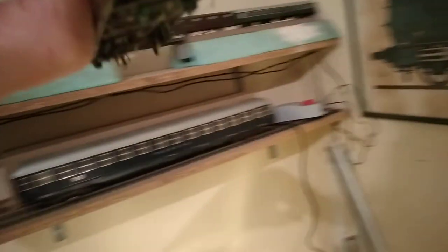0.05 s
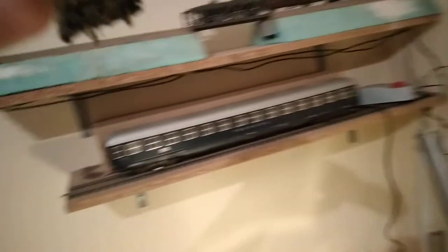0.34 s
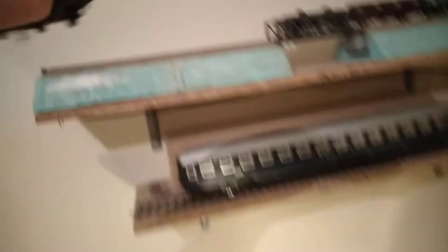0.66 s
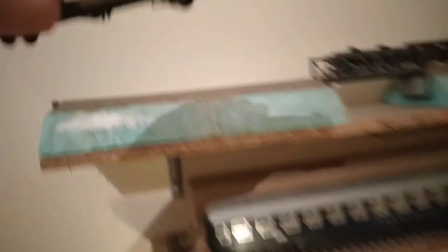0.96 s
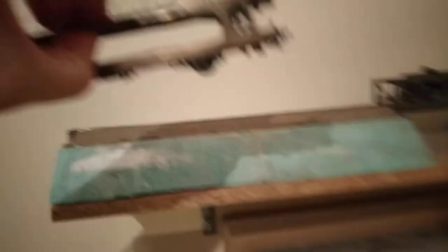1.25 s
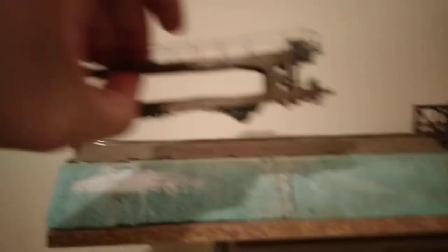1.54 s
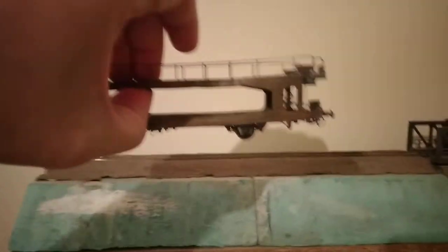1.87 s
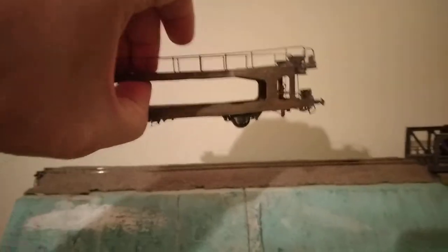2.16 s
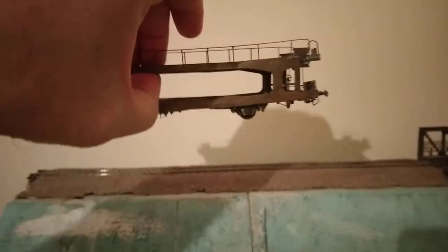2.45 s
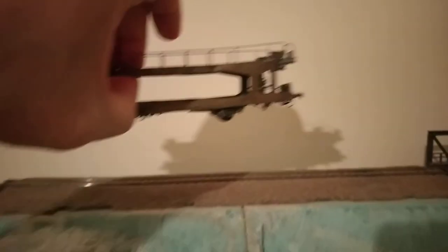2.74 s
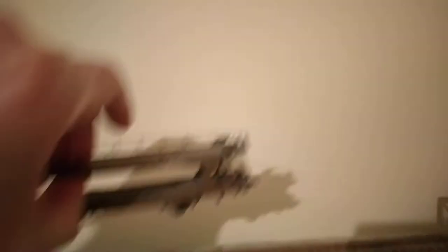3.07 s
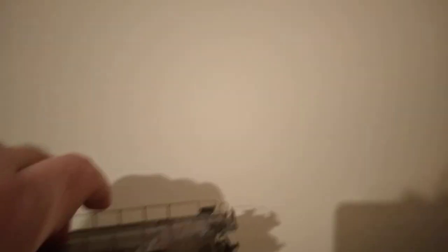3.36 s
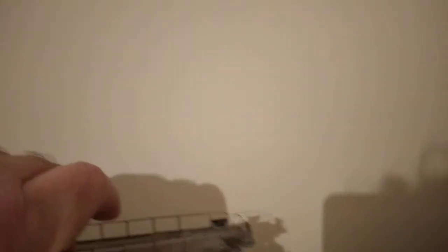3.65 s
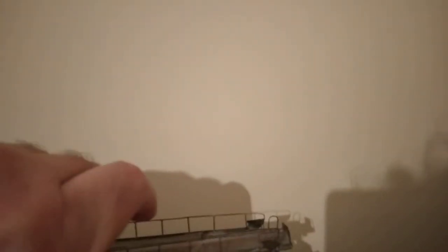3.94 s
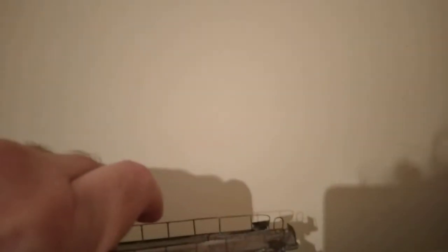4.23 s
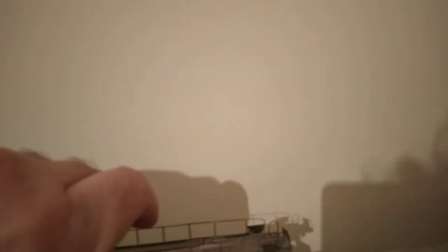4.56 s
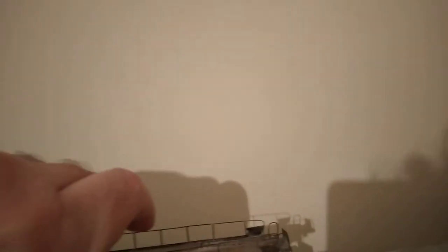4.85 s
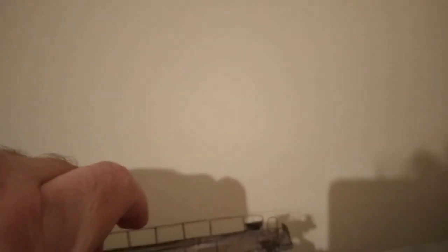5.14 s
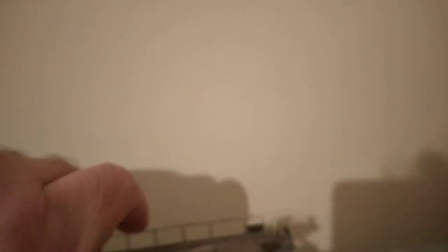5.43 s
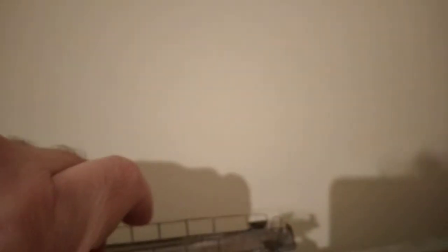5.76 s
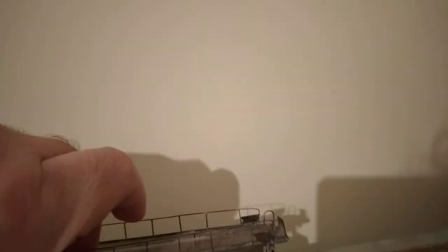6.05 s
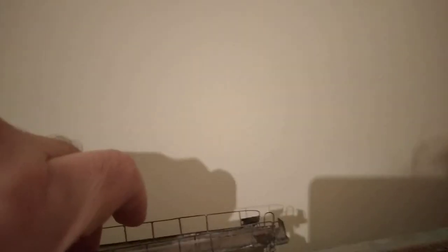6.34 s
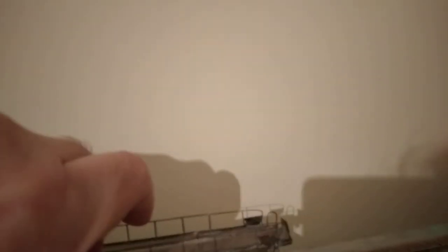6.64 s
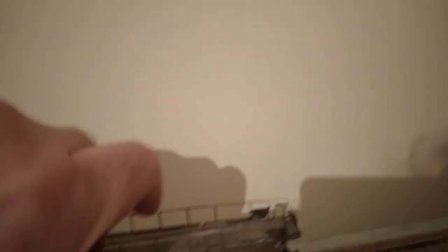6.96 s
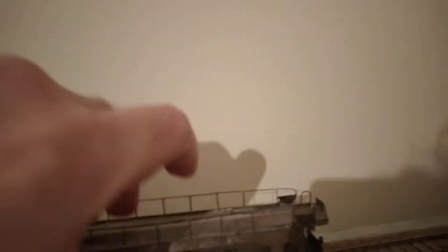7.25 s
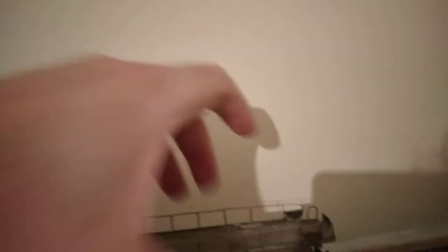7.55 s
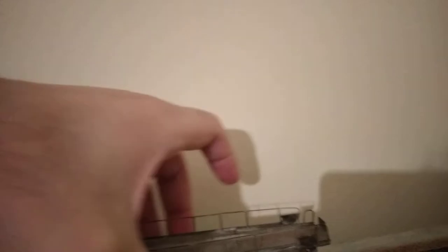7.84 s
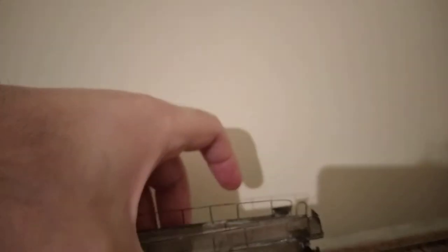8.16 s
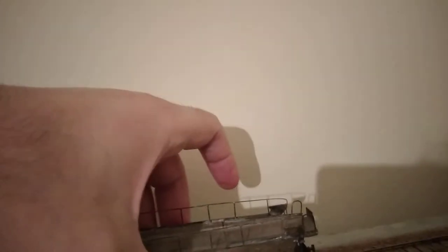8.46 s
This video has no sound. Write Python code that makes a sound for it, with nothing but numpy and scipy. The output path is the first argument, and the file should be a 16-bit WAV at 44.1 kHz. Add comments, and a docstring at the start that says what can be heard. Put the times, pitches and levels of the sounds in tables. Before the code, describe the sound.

Sharp clicks, small knocks and faint scraping as a model wagon is lifted from a shelf and fitted onto rails, with a lull between.

```python
"""In a small, quiet room a model railway wagon is pulled along a wooden shelf, which drones under its
wheels. The wagon is lifted off with a clatter. In the lull, the hand-held microphone's noise gate (a mute
for faint sound) flutters: the hand's tremor pushes it open, and it shuts whenever the hand is steady.
From 4.5 s the wagon is fitted onto a track, wheels and frame clicking and scraping on the rails. Then
the gate flutters again around two last clicks. The microphone makes everything dull above 2.5 kHz."""
import sys
import numpy as np
from scipy import signal
from scipy.fft import rfft, irfft, next_fast_len
from scipy.io import wavfile
from scipy.ndimage import uniform_filter1d, minimum_filter1d

SR = 44100
rng = np.random.default_rng(int(sys.argv[2]) if len(sys.argv) > 2 else 0)


def inscribe(sig):
    """Save sig as 16-bit PCM at rate SR to the path in sys.argv[1].

    A 1-D sig is mono; a 2-D sig holds one channel per row.
    Samples are clipped to [-1, 1] before scaling.
    """
    pcm = np.round(np.clip(np.atleast_2d(sig).T, -1, 1) * 32767)
    wavfile.write(sys.argv[1], SR, pcm.astype(np.int16))


N = 383669
TIME = np.arange(N) / SR


def amp(db):
    """Turns decibels into a factor to multiply a sound by."""
    return 10 ** (np.asarray(db) / 20)


def rms(x):
    """The average strength of a signal (root mean square)."""
    return np.sqrt(np.mean(x ** 2) + 1e-24)


def read_curve(points, hz):
    """Reads between the rows of a (pitch_hz, value) table, with octaves evenly spaced."""
    pitches, values = np.transpose(points)
    return np.interp(np.log(hz + 1), np.log(pitches + 1), values)


def level_curve(rows, column):
    """A smooth volume curve from a table of times and decibels, silent after the last row."""
    rows = np.asarray(rows)
    gain = amp(np.interp(TIME, rows[:, 0], rows[:, column]))
    return uniform_filter1d((TIME <= rows[-1, 0]) * gain, size=400)


def stroke(start, length, attack, release):
    """Rises from 0 to 1, holds, and falls back once its length is over (all in seconds)."""
    return np.clip((TIME - start) / attack, 0, 1) * np.clip(1 - (TIME - start - length) / release, 0, 1)


def add(mix, start_s, sound):
    """Adds a stereo sound to the mix at the given time."""
    part = mix[:, max(round(start_s * SR), 0):][:, :sound.shape[1]]
    part += sound[:, :part.shape[1]]


def microphone_pair(spectra, hz, balance):
    """Turns two unrelated spectra into left and right: alike in the bass, different in the treble."""
    # how alike the two microphone openings sound: pitch_hz, likeness (-1 to 1)
    likeness = [(50, .94), (300, .9), (600, .7), (1000, .25), (1900, -.15), (3000, 0), (12000, 0)]
    same = read_curve(likeness, hz)
    lean_left = amp(read_curve(balance, hz) / 2)
    right = same * spectra[0] + np.sqrt(1 - same ** 2) * spectra[1]
    return np.array([spectra[0] * lean_left, right / lean_left])


def room_noise(gain):
    """Stereo noise of strength 1, with its tone shaped by gain(hz)."""
    # how the room's sound leans to one side: pitch_hz, left_minus_right_db
    room_balance = [(60, 0), (92, 1.5), (140, 0), (220, -6.2), (330, -0.8), (500, -5), (770, 1.5),
                    (1180, 3), (1810, 4.5), (2770, 0.4)]
    size = next_fast_len(N, real=True)
    hz = np.fft.rfftfreq(size, 1 / SR)
    spectra = rng.standard_normal((2, len(hz))) + 1j * rng.standard_normal((2, len(hz)))
    sound = irfft(microphone_pair(spectra, hz, room_balance) * gain(hz), size)[:, :N]
    return sound / rms(sound)


def coloured_noise(colour):
    """Room noise whose tone follows a (pitch_hz, level_db) table."""
    return room_noise(lambda hz: amp(read_curve(colour, hz)))


def wander(rate):
    """A smooth random wobble of strength 1 that takes about `rate` new values a second."""
    spectrum = rfft(rng.standard_normal(N // 64))
    hz = np.arange(len(spectrum)) * SR / N
    wobble = irfft(spectrum / (1 + (2 * hz / rate) ** 10))
    return np.interp(TIME, np.linspace(0, N / SR, len(wobble)), wobble / rms(wobble))


def shelf_drone(drone_hz=157.4, waver_hz=1.9, others_db=9, pan_db=1.5):
    """Rolling wheels keep the board droning at its resonances, the pitches it naturally rings at."""
    # how strongly the wheels shake the shelf: time_s, drone_level_db, others_level_db
    rolling = [(0.0, -39, -54), (0.04, -34, -57.5), (0.132, -40, -60), (0.152, -46, -48.5),
               (0.172, -43, -62.5), (0.276, -32.5, -51), (0.414, -42.5, -51), (0.468, -51.5, -65),
               (0.56, -78, -69)]
    # the shelf's other resonances: pitch_hz, half_width_hz, level_db
    resonances = [(94.7, 1.6, 12), (171, 17, 2.5), (261, 12.3, -4.5), (336, 21, -9.5), (445, 25, -16)]
    pitch = drone_hz + waver_hz * wander(rate=40)
    drone = np.sqrt(2) * np.sin(2 * np.pi * np.cumsum(pitch) / SR) * level_curve(rolling, column=1)
    others = room_noise(lambda hz: sum(amp(db) / (1 + ((hz - centre) / width) ** 2) ** 1.1
                                       for centre, width, db in resonances))
    others *= amp(others_db) * level_curve(rolling, column=2)
    return drone * amp([[pan_db], [-pan_db]]) + others


def rubbing(gain_db=2, catch_db=1.6, attack_s=0.019, release_s=0.028):
    """Wagon and fingers rub along; the dry surfaces catch and slip unevenly."""
    # one rubbing stroke a row: start_s, length_s, level_db
    rubs = [(0.0, 0.72, -63.5), (4.633, 0.55, -70), (5.41, 0.38, -70), (6.293, 0.694, -65.5),
            (6.971, 0.37, -68)]
    # tone of the rubbing: pitch_hz, level_db
    rub_colour = [(50, -5), (150, 6.5), (400, -1.5), (650, 1.5), (1300, -4), (1700, -4.5), (2020, 0),
                  (2400, -16), (3300, -33), (8000, -59), (15000, -49.5)]
    pressure = sum(amp(db) * stroke(start, length, attack_s, release_s) for start, length, db in rubs)
    catching = amp(gain_db + catch_db * wander(rate=70))
    return pressure * catching * coloured_noise(rub_colour)


def holding_hand(tremor_hz=5.8, drift_hz=3, grip_db=-2, swell_drop_db=7, rest_db=-13.5, settle_s=0.01):
    """The hand trembles too slowly to hear, rumbles, and shifts softly on the microphone's case."""
    # how much the hand moves: time_s, tremor_db, rumble_db
    movement = [(0.0, -64, -62), (0.75, -62, -68), (1.5, -57.5, -69), (2.1, -60, -61.5), (2.4, -63.5, -66),
                (2.8, -62, -69), (3.0, -55, -62.5), (3.55, -61, -70), (3.75, -62.5, -67), (4.2, -61.5, -72),
                (4.5, -66.5, -68), (5.25, -65, -76), (5.7, -55, -54.5), (5.9, -55, -58), (6.27, -62.5, -49),
                (7.3, -61.5, -68.5), (7.85, -63, -71), (8.7, -61.5, -67.5)]
    # tone of the rumble: pitch_hz, level_db
    rumble_colour = [(8, -1), (25, -9), (42, 6.5), (75, 0.5), (110, -4), (160, -22.5), (400, -49),
                     (1500, -80.5)]
    # skin shifting on the case, one swell a row: middle_s, length_s, level_db
    grip_shifts = [(0.734, 0.17, -68), (1.352, .4, -69.5), (2.091, 0.66, -61), (3.376, 0.79, -62),
                   (5.279, 0.46, -65), (6.731, 0.84, -62)]
    # tone of the shifting skin: pitch_hz, level_db
    grip_colour = [(50, -16), (110, -5), (170, 4), (260, -10), (380, -2), (520, -11.5), (750, -12.5),
                   (2000, -54)]
    # moments when the hand holds steady: start_s, length_s
    rests = [(2.353, 0.023), (2.519, 0.0333), (2.798, 0.044), (3.761, 0.025), (3.943, 0.088), (4.26, 0.19),
             (4.599, 0.059), (7.668, .115), (8.004, .12), (8.169, 0.098), (8.444, 0.055)]
    cycles = np.cumsum(tremor_hz + drift_hz * wander(rate=16)) / SR
    tremor = np.sqrt(2) * np.sin(2 * np.pi * cycles) * level_curve(movement, column=1)
    rumble = level_curve(movement, column=2) * coloured_noise(rumble_colour)
    swells = sum(amp(db - swell_drop_db * (2 * (TIME - middle) / length) ** 2)
                 for middle, length, db in grip_shifts)
    grip = amp(grip_db) * swells * coloured_noise(grip_colour)
    steady = sum(stroke(start - settle_s, length, settle_s, settle_s) for start, length in rests)
    return (tremor + rumble + grip) * amp(rest_db * steady)


def room_hiss(hiss_db=-69.0, flutter_db=1.5):
    """The still room hisses faintly, its level flickering a little."""
    # tone of the hiss: pitch_hz, level_db
    hiss_colour = [(20, -3), (150, -6), (300, -6.5), (600, -12.5), (1200, -7.5), (1650, -12.5),
                   (2020, -8.5), (2500, -22.5), (3400, -40.5), (8000, -43), (15500, -45.5)]
    return coloured_noise(hiss_colour) * amp(hiss_db + flutter_db * wander(rate=50))


def causal_filter(gain):
    """A filter with this gain that lets nothing sound before the blow (minimum phase)."""
    cepstrum = irfft(np.log(np.maximum(gain, 1e-5)))
    half = len(cepstrum) // 2
    cepstrum[1:half] *= 2
    cepstrum[half + 1:] = 0
    return np.exp(rfft(cepstrum))


def wagon_clicks(gain_db=-6.0, thud_boost_db=2, tick_boost_db=2, thud_below_hz=480, tick_above_hz=3200,
                 rise_s=0.0011, crack_db=3, crack_s=0.0023, ring_db=-18, focus_db=4, focus_octaves=0.26,
                 thud_room_db=-9, thud_room_s=0.55, knock_room_db=-14, knock_room_s=0.37,
                 rattle_db=-5, rattle_s=0.04, tick_damping=1.1):
    """Each contact is a thud of the shelf, a ringing knock of the wagon and a tick of its loose parts."""
    # the wagon hits shelf or rail; thud and tick are relative to the knock's level:
    # start_s, level_db, thud_db, tick_db, pitch_hz, chatter_decay_ms
    contacts = [(0.241, -51, 1.5, -32.5, 900, 5), (0.377, -48.5, -3.5, -34, 1000, 6.7),
                (0.691, -54, 2, -47, 1020, 2.2), (0.937, -52, 3.5, -50, 594, 52.3),
                (1.052, -31.5, 1, -26.5, 730, 15.5), (1.083, -33, -7, -24, 710, 20),
                (1.112, -38, -5, -37, 960, 34), (1.452, -52.5, 0, -39, 795, 7.1),
                (1.611, -32, -11, -29.5, 1240, 28), (1.76, -47.5, -8.5, -52, 1330, 8.7),
                (1.813, -45, -7.5, -29, 1110, 2.4), (1.85, -19.5, -22, -29, 1840, 2.3),
                (2.023, -39.5, -12.5, -45, 1700, 10.5), (4.542, -47.5, -9.5, -29, 815, 15),
                (4.561, -46.5, -24, -31.5, 1410, 14), (4.665, -53, -11, -37, 706, 54),
                (4.703, -42, -23, -28.5, 1240, 14), (4.795, -43, -13, -24.5, 1130, 22),
                (5.074, -54.5, -18, -30, 755, 7), (5.091, -47.5, -14, -32, 1560, 27),
                (5.242, -53.5, -18, -40, 1430, 15), (5.258, -40, -11, -19, 1440, 25),
                (5.286, -42, -13.5, -36, 680, 30.4), (5.468, -48, -12, -43, 714, 5),
                (6.166, -51, -18, -51, 710, 42), (6.207, -35.5, -10, -27.5, 730, 21),
                (6.254, -45, -18.5, -36, 705, 15), (6.372, -49.5, -8.5, -28, 1410, 36),
                (6.398, -31, -13.5, -16.5, 1320, 20), (6.403, -40.5, -10, -13.5, 1560, 11),
                (6.532, -44, -32, -24, 1450, 11), (6.683, -48.5, -4, -55, 1390, 5.5),
                (6.736, -46.5, -4, -31, 716, 20), (6.749, -34.5, -14, -22.5, 1670, 18),
                (6.762, -38.5, -14, -19.5, 1440, 12), (7.086, -48.5, -4.5, -29, 700, 17),
                (7.229, -56.5, -9, -32, 1110, 8.4), (7.435, -70.5, -8.5, -6.5, 2010, 6.1),
                (8.291, -59.5, 3, -30, 770, 22), (8.508, -60, 1, -41, 1100, 42)]
    # the wagon ringing on the shelf: pitch_hz, level_db, ring_s (time to fade by 60 dB)
    body_modes = [(178, -11, .22), (263, -10, .2), (300, -8, .2), (427, -10, .14), (495, -10, .12),
                  (735, -10, .07), (940, 0, .13), (1016, 0, .13), (1390, -5, .08), (1495, -1, .1),
                  (1545, 0, .11), (1667, 0, .11), (1846, -4, .08), (1925, -5, .08), (2053, -3, .11),
                  (2203, -2, .11), (2680, -2, .05), (6100, 1, .04)]
    # tone of a click: pitch_hz, level_db
    click_colour = [(40, -33), (90, -15), (170, -4.5), (260, -8), (400, -1.5), (560, -5), (760, 2),
                    (1000, -2), (1600, 1), (2100, -1.5), (2600, -6.5), (3100, -19), (4400, -30.5),
                    (7000, -34.5), (9000, -44), (12000, -50.5), (16000, -66)]
    # how the wagon's sound leans to one side: pitch_hz, left_minus_right_db
    wagon_balance = [(160, 1), (450, -1.5), (1000, 3), (1800, 6), (4000, 3.5), (8000, -1), (14000, 0)]
    size, onset_samples = 16384, round(0.012 * SR)
    t, hz = np.arange(size) / SR, np.fft.rfftfreq(size, 1 / SR)
    colour = amp(read_curve(click_colour, hz))
    low = 1 / (1 + (hz / thud_below_hz) ** 6)
    high = 1 - 1 / (1 + (hz / tick_above_hz) ** 8)
    bands = [causal_filter(colour * share) for share in (low, (1 - low) * (1 - high), high)]
    modes = np.array([amp(db - 60 * t / ring_s) * np.exp(2j * np.pi * mode_hz * t)
                      for mode_hz, db, ring_s in body_modes])
    thud_tail = amp(thud_room_db - 60 * t / thud_room_s)
    knock_tail = amp(knock_room_db - 60 * t / knock_room_s)
    crack = amp(crack_db) * np.exp(-t / crack_s)  # the first touch is the hardest
    attack = 1 - np.exp(-t / rise_s)
    fade = np.minimum(1, 10 * (1 - t / t[-1])) ** 2
    mix = np.zeros((2, N))
    for start_s, level_db, thud_db, tick_db, pitch_hz, chatter_decay_ms in contacts:
        grain = rng.standard_normal((2, size))
        chatter = np.exp(-1000 * t / chatter_decay_ms)
        # light touches linger; hard blows stand further out of the room's echo
        linger = amp(0.087 * (-38 - level_db))
        # the harder the tick, the longer the loose parts rattle
        lasts_s = rattle_s * amp(0.3 * (level_db + tick_db + 50))
        rattle = amp(rattle_db) * np.exp(-(t / lasts_s) ** 2)
        # every point of contact rings the wagon differently and favours its own pitch
        phases = np.exp(2j * np.pi * rng.random((2, len(modes))))
        ring = amp(ring_db) * (phases @ modes).real
        focus = amp(focus_db * np.exp(-(np.log2((hz + 1) / pitch_hz) / focus_octaves) ** 2))
        decays = (np.hypot(crack + chatter, linger * thud_tail),  # low thud
                  np.hypot(crack + chatter, linger * knock_tail),  # middle knock
                  np.hypot(crack + chatter ** tick_damping, rattle))  # high tick
        band_levels = (thud_db + thud_boost_db, 0, tick_db + tick_boost_db)
        for band, decay, band_db in zip(bands, decays, band_levels):
            blow = attack * fade * (grain * decay + ring)
            part = fade * irfft(microphone_pair(rfft(blow), hz, wagon_balance) * band * focus)
            gain = amp(gain_db + level_db + band_db) / rms(part[:, :onset_samples])
            add(mix, start_s - rise_s, part * gain)
    return mix


def scene():
    """Everything that reaches the microphone."""
    return shelf_drone() + rubbing() + holding_hand() + room_hiss() + wagon_clicks()


def record(dry, threshold_db=-55.5, knee_db=2.5, shut_db=-34, self_noise_db=-106.5, cutoff_hz=15800):
    """A fast gate shuts when the sound is faint; the electronics add hiss and cut the highest treble."""
    # the highest peak of the last 3 ms
    peaks = -minimum_filter1d(-abs(dry).max(axis=0), size=133, origin=66)
    shut = np.clip((threshold_db - 20 * np.log10(peaks + 1e-9)) / knee_db, 0, 1)
    gated = dry * amp(shut_db * uniform_filter1d(shut, size=24))
    self_noise = amp(self_noise_db) * rng.standard_normal((2, N))
    treble_cut = signal.firwin(511, cutoff_hz, window=("kaiser", 9), fs=SR)
    return signal.oaconvolve(gated + self_noise, treble_cut[None], "same")


dry = scene()
out = record(dry)
inscribe(out)
```